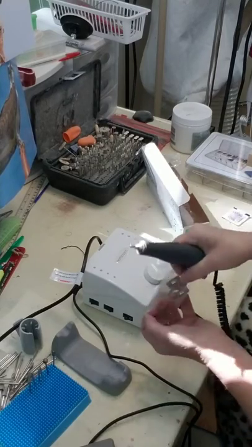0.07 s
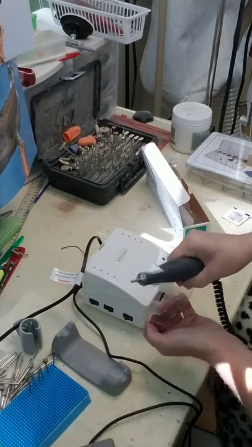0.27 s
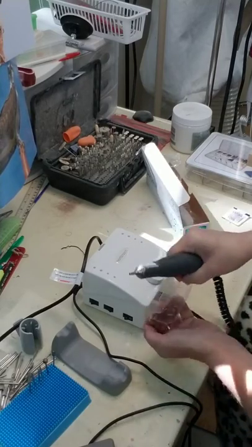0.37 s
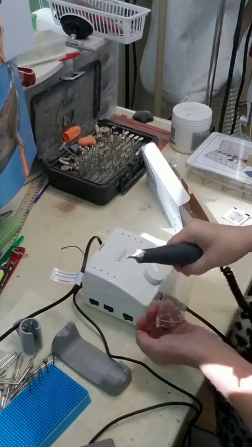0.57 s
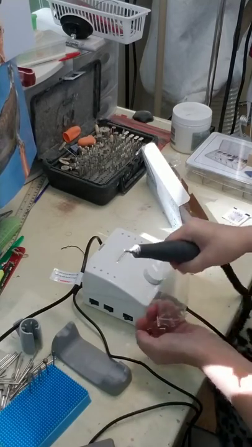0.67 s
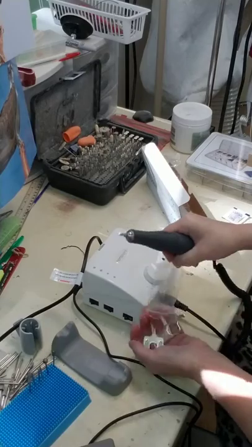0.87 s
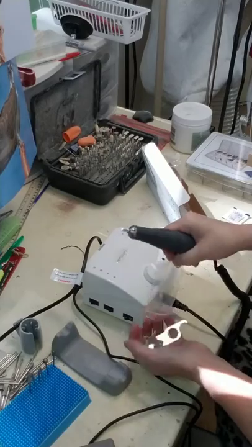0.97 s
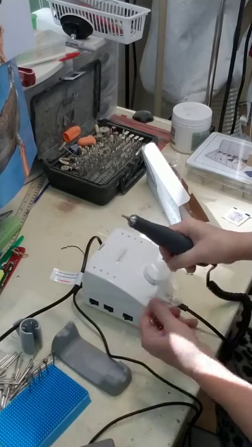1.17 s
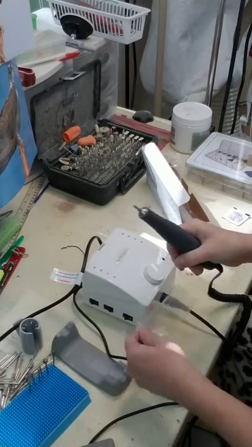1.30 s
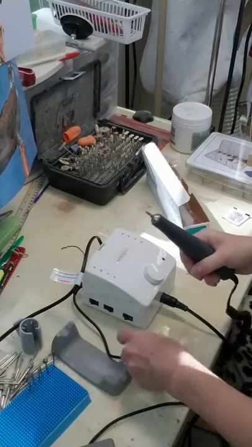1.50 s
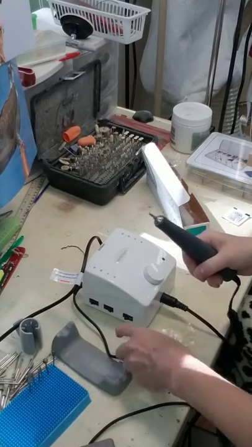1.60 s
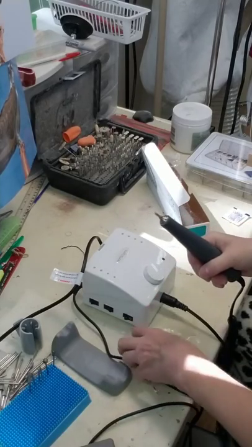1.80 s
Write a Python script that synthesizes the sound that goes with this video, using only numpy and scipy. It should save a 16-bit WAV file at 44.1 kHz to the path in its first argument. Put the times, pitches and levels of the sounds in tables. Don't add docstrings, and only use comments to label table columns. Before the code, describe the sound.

Small steel spanners rattle in a crinkly plastic bag, brightest early on, then a few faint clinks, a sharp film crackle as it is squeezed and set down; close phone microphone, small room, faint hum.

```python
import sys
import numpy as np
from scipy import signal
from scipy.fft import rfft, irfft
from scipy.io import wavfile

SR = 44100
rng = np.random.default_rng(int(sys.argv[2]) if len(sys.argv) > 2 else 0)


def wav_record(signal):
    frames = np.transpose(np.atleast_2d(signal))
    bounded = np.clip(frames, -1, 1)
    quanta = np.round(bounded * 32767).astype(np.int16)
    wavfile.write(sys.argv[1], SR, quanta)


def undo_db(level):
    steps = np.asarray(level, float) / 20
    return 10 ** steps


N = 81585

# start in seconds, peak level in dB.
STRIKES = [
    [(0.1945, -49.5), (0.202, -64), (0.2169, -42.5), (0.2244, -39.5), (0.3002, -28), (0.3114, -29),
     (0.3227, -27), (0.34, -30), (0.3461, -29), (0.3545, -39.5), (0.372, -57), (0.3884, -65), (0.397, -53),
     (0.465, -51), (0.492, -52), (0.51, -68), (0.559, -53), (0.573, -60.5), (0.6814, -43), (0.694, -53),
     (0.7148, -35.5), (0.727, -61), (0.741, -63), (0.7891, -58.5), (0.8634, -56), (0.874, -75),
     (1.0326, -73), (1.7928, -42.5), (1.807, -53), (1.8254, -56.5)],
    [(0.2164, -43), (0.2249, -33), (0.2354, -33.5), (0.2474, -49), (0.2614, -44), (0.2844, -40.5),
     (0.3107, -34.5), (0.3244, -47), (0.3591, -38), (0.3655, -54), (0.3715, -54), (0.4585, -56),
     (0.4718, -50.5), (0.4928, -49.5), (0.512, -61), (0.6809, -46), (0.693, -61), (0.7143, -50),
     (0.721, -64), (1.7918, -47), (1.8, -65), (1.81, -60)],
    [(0.2245, -42.5), (0.2324, -37.5), (0.2425, -38), (0.2494, -39.5), (0.2675, -44), (0.2864, -35),
     (0.3112, -40.5), (0.5482, -51), (0.64, -72), (0.6865, -49), (0.7143, -55), (0.7494, -56), (0.761, -75),
     (0.8639, -61), (0.883, -73)],
]
# start in seconds, peak level in dB.
MORE_STRIKES = [
    [(0.2304, -40), (0.247, -45), (0.2554, -34), (0.3107, -22.5), (0.3536, -25), (0.478, -50),
     (0.4845, -31), (0.5, -52), (0.5524, -67), (0.6944, -37), (0.7144, -40), (0.7394, -45), (0.7731, -58)],
    [(0.3012, -43.5), (0.309, -44), (0.3398, -46.5), (0.3516, -33.5), (0.358, -63), (0.3605, -33.5),
     (0.37, -47.5), (0.4733, -59), (0.486, -62.5), (0.494, -58), (0.511, -76), (0.6809, -55.5),
     (0.695, -70)],
    [(0.2274, -45), (0.239, -68), (0.2783, -54), (0.3004, -49), (0.3114, -41.5), (0.319, -71),
     (0.4708, -52.5), (0.481, -67), (0.491, -55.5), (0.5074, -62), (0.5496, -52), (0.572, -74),
     (0.592, -70), (0.6804, -59), (0.7143, -53), (0.7527, -73), (0.8609, -59.5), (0.873, -75),
     (1.7918, -55), (1.7985, -59), (1.808, -74), (1.821, -64)],
    [(0.2385, -46), (0.261, -72), (0.3114, -41), (0.325, -52), (0.464, -65), (0.471, -61), (0.6815, -59.5),
     (0.7165, -50.5), (0.737, -70), (0.7505, -60), (1.114, -71), (1.7985, -61)],
]
# level in dB, T60 in seconds.
PART_MODES = [
    [(0, 0.1), (-11, 0.077), (-50.5, .05)],
    [(-1.5, 0.09), (-45.5, 0.027), (-13, 0.017)],
    [(-2, 0.27), (-4.5, 0.066)],
    [(0, 0.072), (-1, 0.065)],
    [(2, 0.086), (-5.5, 0.074), (-35, 0.028)],
    [(5, 0.045), (-10, 0.03)],
    [(1, 0.08), (-3, 0.056)],
]
PART_HZ = [
    [10826, 10776, 10695],
    [9203, 9320, 9250],
    [11392, 11455],
    [13890, 13925],
    [3745, 3590, 3885],
    [6188, 6110],
    [7192, 4895],
]
# time in seconds, level in dB.
FILM_WORK = [(0, -66), (.11, -64), (.17, -67.5), (.23, -54.5), (0.342, -50.5), (.43, -60.5), (.56, -65),
             (.64, -73), (.79, -70), (.83, -59.5), (.95, -80), (1.151, -86.5), (1.175, -57), (1.245, -47),
             (1.31, -63), (1.49, -82), (1.623, -67.5), (1.76, -82.5)]
# frequency in Hz, level in dB.
FILM_SPECTRUM = [(200, -51.5), (500, -35.5), (1000, -25.5), (1300, -25.5), (4500, -2.5), (7700, -4.5),
                 (11400, -2), (14500, 8)]
# start in seconds, dull part in dB, bright part in dB, panel pitch in Hz.
CREASES = [(0.0165, -38, -59, 4700), (0.0385, -38.5, -51, 4100), (0.0552, -36, -45, 3640),
           (0.0609, -55.5, -66, 3820), (0.0762, -32, -33, 3760), (0.0919, -33, -40, 3750),
           (0.0953, -43, -54, 3780), (0.1034, -46.5, -50, 3660), (0.1477, -41, -40, 2800),
           (0.155, -51, -54, 3860), (0.1791, -44, -47, 3660), (0.1883, -55, -58, 4300),
           (0.1959, -33.5, -44, 3640), (0.1997, -33.5, -39, 2960), (0.2077, -52, -39, 3120),
           (0.2177, -32, -50, 2910), (0.301, -58, -26, 5950), (0.3115, -40, -44, 6000),
           (0.3232, -25.5, -22, 4260), (0.3262, -24, -40, 4650), (0.3285, -28.5, -50, 4440),
           (0.3387, -49, -29, 3670), (0.3531, -27, -22, 3020), (0.398, -32.5, -28, 3970),
           (0.4083, -38, -56, 3480), (0.4612, -57, -57, 3950), (0.4655, -65, -61, 3860),
           (0.4714, -46, -35, 5960), (0.4775, -39, -49, 4400), (0.4935, -48, -44, 4900),
           (0.4955, -54, -42, 4800), (0.4993, -45, -53, 4950), (0.5275, -44, -43, 2800),
           (0.5313, -42.5, -48, 4050), (0.5363, -47, -52, 3750), (0.5425, -41, -44, 4720),
           (0.5444, -36.5, -42, 5000), (0.5598, -41, -48, 3530), (0.5658, -43.5, -52, 4300),
           (0.6673, -52, -53, 6000), (0.681, -48, -36.5, 3750), (0.7147, -43.5, -35.5, 6240)]
# start in seconds, dull part in dB, bright part in dB, panel pitch in Hz.
LATE_CREASES = [(0.7798, -48, -52, 6100), (0.7985, -47.5, -46, 5940), (0.8119, -39.5, -47, 4850),
                (0.816, -51.5, -48, 4870), (0.8228, -62, -47, 3800), (0.8279, -36, -33.5, 4320),
                (0.9127, -48, -53.5, 3690), (1.1827, -44.5, -47, 4900), (1.1919, -35.5, -39.5, 3560),
                (1.2005, -36.5, -41, 3500), (1.2042, -38, -42, 5730), (1.2121, -31, -34, 4440),
                (1.2163, -37, -31, 2880), (1.2328, -22.5, -34, 4700), (1.2344, -26, -29, 4440),
                (1.2406, -32, -33, 3460), (1.2442, -51, -34, 3470), (1.2465, -22.5, -24, 4570),
                (1.2553, -37, -17, 3530), (1.2577, -39, -43, 3900), (1.2666, -42, -52, 4260),
                (1.2704, -48, -40, 4400), (1.277, -44, -48, 4500), (1.2809, -59, -56, 4050),
                (1.3602, -42.5, -41, 4770), (1.5205, -48.5, -59, 3760), (1.5295, -53, -63, 5060),
                (1.536, -55, -57, 5130), (1.559, -78, -56, 4970), (1.5715, -70, -71, 4600),
                (1.5972, -33.5, -45, 5510), (1.6078, -59, -69, 5370), (1.6259, -61, -64, 5370),
                (1.6325, -42.5, -58, 5180), (1.6422, -51, -55, 6400), (1.7922, -60, -44, 6300),
                (1.7984, -73, -37, 6200), (1.8038, -62, -39, 6000), (1.8062, -70, -47, 6360)]
# start in seconds, peak level in dB.
PUSHES = [
    (0.322, -63.5),
    (0.826, -62.5),
    (1.172, -65.5),
    (1.223, -63.5),
    (1.249, -76),
]
# frequency in Hz, level in dB, T60 in seconds.
BENCH_MODES = [(128.2, 2, 0.052), (386, -1.0, 0.033)]
# multiple of the base frequency, rms level in dB.
HUM = [(1, -79.5), (2, -78), (4, -85.5)]
# frequency in Hz, level in dB.
AIR_SPECTRUM = [(15, -28), (45, -6.5), (120, -5.5), (200, -13.5), (520, -15), (620, -22.5), (4000, -29),
                (14500, -27.5)]


def coloured(x, points):
    hz, db = np.transpose(points)
    bins_hz = np.arange(N // 2 + 1) * SR / N
    gain = undo_db(np.interp(np.log(bins_hz + 1), np.log(hz), db))
    y = irfft(rfft(x) * gain, N)
    return y / np.std(y)


def clicks_at(s, heights):
    return np.bincount(np.clip((s * SR).astype(int), 0, N - 1), heights, minlength=N)


def ring(clicks, hz, t60):
    r, w = undo_db(-60 / (t60 * SR)), 2 * np.pi * hz / SR
    return signal.lfilter([0, np.sin(w)], [1, -2 * r * np.cos(w), r * r], clicks + 1e-18)


def dying(clicks, t60):
    return signal.lfilter([1], [1, -undo_db(-60 / (t60 * SR))], clicks + 1e-18)


def band(x, low_hz, high_hz):
    return signal.sosfilt(signal.butter(2, [low_hz, high_hz], "band", fs=SR, output="sos"), x)


def background():
    hum_hz, air_db = 120, -74
    t = np.arange(N) / SR
    hum = sum(np.sqrt(2) * undo_db(db) * np.sin(2 * np.pi * (k * hum_hz * t + rng.random())) for k, db in HUM)
    return hum + undo_db(air_db) * coloured(rng.standard_normal(N), AIR_SPECTRUM)


def crinkle():
    creases_per_s, spread_db, level_db, cycles = 14000, 0.5, 4, 14.3
    s, db = np.transpose(FILM_WORK)
    sizes = undo_db(spread_db * np.minimum(rng.exponential(1, N), 4)) * rng.standard_normal(N)
    grains = sizes * (rng.random(N) < creases_per_s / SR)
    pitches = np.geomspace(300, 14500, num=28)
    dealt = rng.integers(28, size=N)
    rings = sum(ring(grains * (dealt == k), hz, cycles / hz) for k, hz in enumerate(pitches))
    work = undo_db(np.interp(np.arange(N) / SR, s, db) + level_db)
    return work * coloured(rings, FILM_SPECTRUM)


def snaps():
    panel_db, panel_t60_s = -14, 0.026
    body_hz, body_ring_db, body_t60_s = 1797, -31.5, 0.029
    crack_db, snap_t60_s = 10.5, 0.0039
    settle_db, settle_t60_s = -12, 0.04
    s, dull_db, bright_db, panel_hz = np.transpose([*CREASES, *LATE_CREASES])
    out = np.zeros(N)
    for k, hz in enumerate(panel_hz):
        out += ring(clicks_at(s[[k]], undo_db(dull_db[[k]] + panel_db)), hz, panel_t60_s)
    out += ring(clicks_at(s, undo_db(dull_db + body_ring_db)), body_hz, body_t60_s)
    crack_bands = [(dull_db - 25, 600, 1150),
                   (dull_db - 5.5, 2300, 6500),
                   (bright_db + 1.5, 9300, 14500)]
    for db, low_hz, high_hz in crack_bands:
        flips = clicks_at(s, undo_db(db))
        shape = dying(flips, snap_t60_s) + undo_db(settle_db) * dying(flips, settle_t60_s)
        crack = undo_db(crack_db) * flips + shape * rng.standard_normal(N)
        out += band(band(crack, low_hz, high_hz), 0.74 * low_hz, 1.185 * high_hz)
    return band(out, 390, 12800)


def steel():
    rattle_s, rattle_db, touch_spread = 0.005, -8.5, 0.3
    grip_left_db, grip_t60_s = -10.0, 0.012
    contact_s = 0.00042
    tick_db, tick_t60_s = -12, 0.0049
    span = SR // 4
    out = np.zeros(N + SR)
    span_s = np.arange(span) / SR
    onset = 1 - np.exp(-span_s / contact_s)
    for strikes, pitches, modes in zip([*STRIKES, *MORE_STRIKES], PART_HZ, PART_MODES):
        s, db = np.transpose(strikes)
        late = np.c_[0 * s, rng.uniform(.3, 1.6, (len(s), 4)).cumsum(axis=1) * rattle_s]
        levels = db[:, None] + np.r_[0, rattle_db - 1.5 * np.arange(4)]
        free = np.diff(s, append=s[-1] + 1)[:, None]
        after = np.maximum(span_s - free, 0)
        choke = undo_db(grip_left_db) + (1 - undo_db(grip_left_db)) * undo_db(-60 * after / grip_t60_s)
        sound = np.zeros((len(s), span))
        rows, places = np.arange(len(s))[:, None], (late * SR).astype(int)
        for hz, (mode_db, t60) in zip(pitches, modes):
            force = 1 + touch_spread * rng.uniform(-1.32, 1, late.shape)
            clicks = np.zeros((len(s), span))
            clicks[rows, places] = undo_db(levels + mode_db) * force * (late < free)
            sound += ring(clicks, hz, t60)
        for start, row in zip((s * SR).astype(int), sound * choke * onset):
            out[start:start + span] += row
        out[:N] += undo_db(tick_db) * dying(clicks_at(s, undo_db(db)), tick_t60_s) * rng.standard_normal(N)
    return band(band(out[:N], 2200, 14000), 3200, 13000)


def pushes():
    push_hz, push_s = 530, 0.018
    s, db = np.transpose(PUSHES)
    swell = dying(dying(clicks_at(s, undo_db(db)), 5.5 * push_s), push_s)
    shape = swell * 5.85 / (push_s * SR)
    knock = np.zeros(N)
    for hz, mode_db, t60 in BENCH_MODES:
        knock += ring(clicks_at(s + push_s / 10, undo_db(db + mode_db)), hz, t60)
    return band(knock, 60, 1000) + 7.9 * band(shape * rng.standard_normal(N), 87.7, push_hz)


def room(x):
    t60_s, wall_cut_hz = 0.23, 11800
    out = np.zeros(N)
    dull = np.exp(-2 * np.pi * wall_cut_hz / SR)
    lags = (rng.uniform(0.0049, .03, size=10) * SR).astype(int)
    for k, lag in enumerate(lags):
        loop, state = x.copy(), [0.]
        gain = undo_db(-60 * lag / SR / t60_s)
        for i in range(lag, N, lag):
            back, state = signal.lfilter([gain * (1 - dull)], [1, -dull], loop[i - lag:i], zi=state)
            loop[i:i + lag] += back[:N - i]
        out += (loop - x) * (-1) ** k
    return out


def scene():
    room_db = -21
    bag = crinkle() + snaps() + steel()
    return (bag + undo_db(room_db) * room(bag) + pushes() + background())[None]


def roll_off(x):
    return signal.sosfilt(signal.butter(12, 15250, fs=SR, output="sos"), x)


def record(dry):
    notch_hz, notch_width_hz, notch_depth = 7445, 720, 0.46
    cutoff_hz = 14420
    b, a = signal.iirpeak(notch_hz, notch_hz / notch_width_hz, fs=SR)
    x = dry - notch_depth * signal.lfilter(b, a, dry)
    x = signal.sosfilt(signal.cheby2(10, 38, cutoff_hz, fs=SR, output="sos"), x)
    return roll_off(x)


dry = scene()
out = record(dry)
wav_record(out)
```